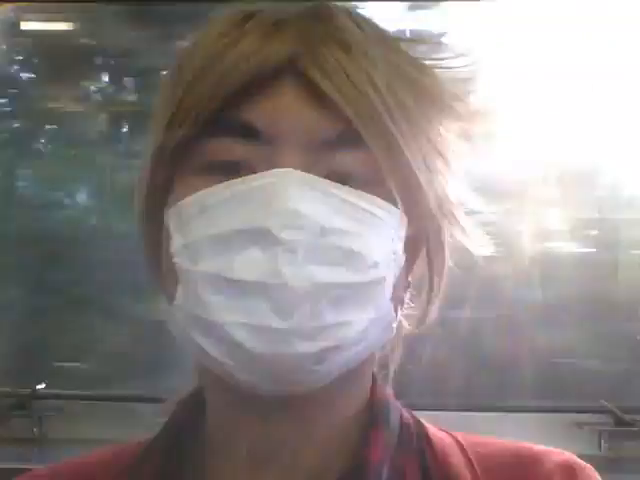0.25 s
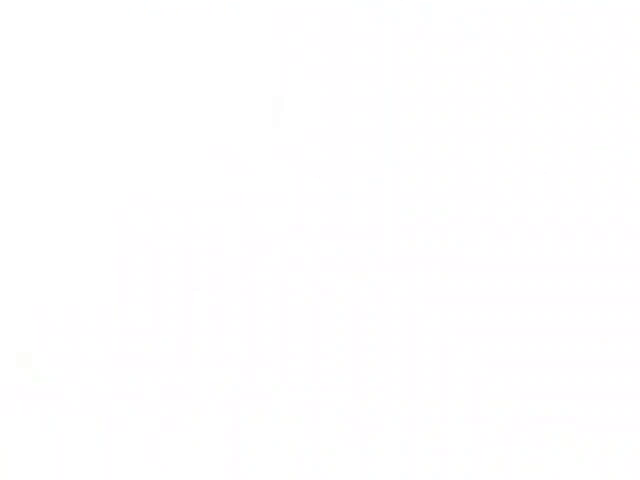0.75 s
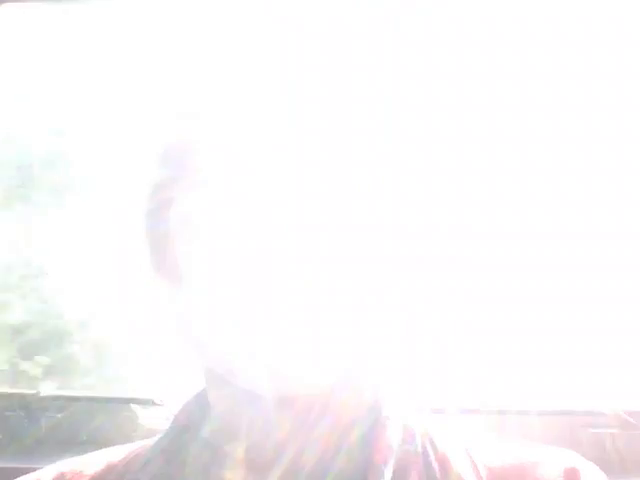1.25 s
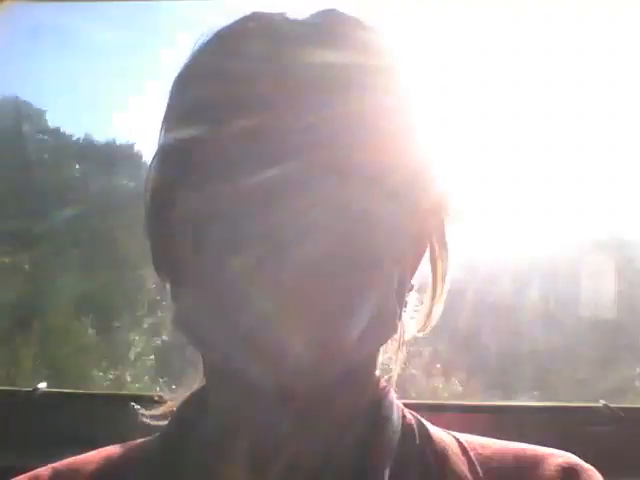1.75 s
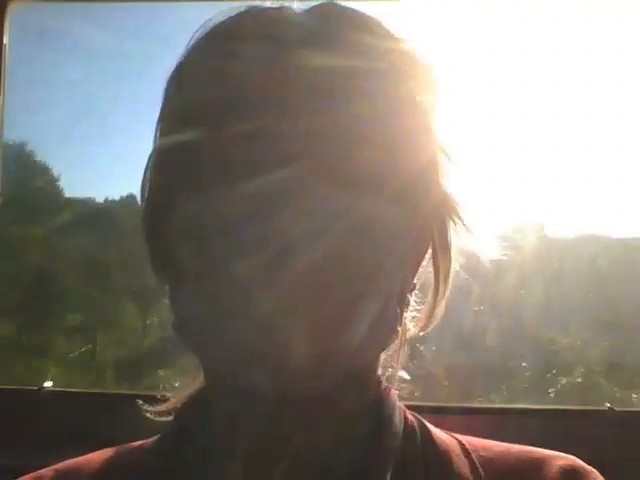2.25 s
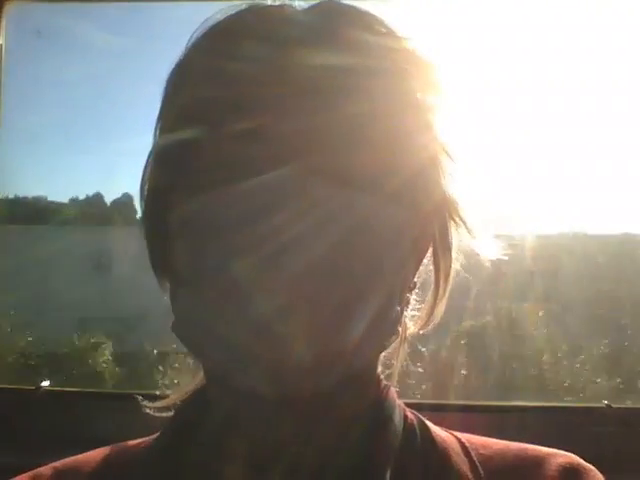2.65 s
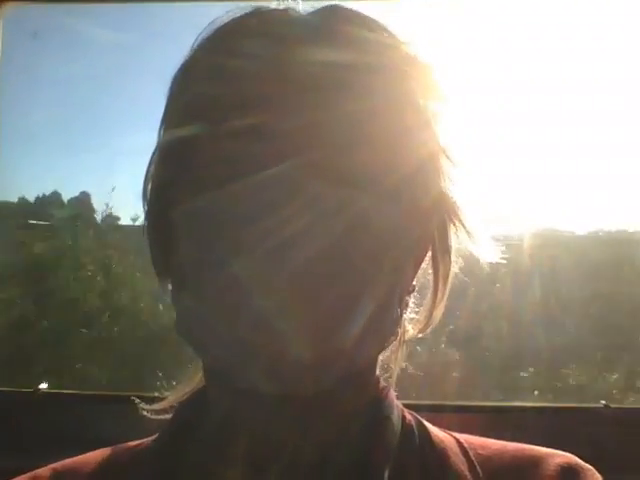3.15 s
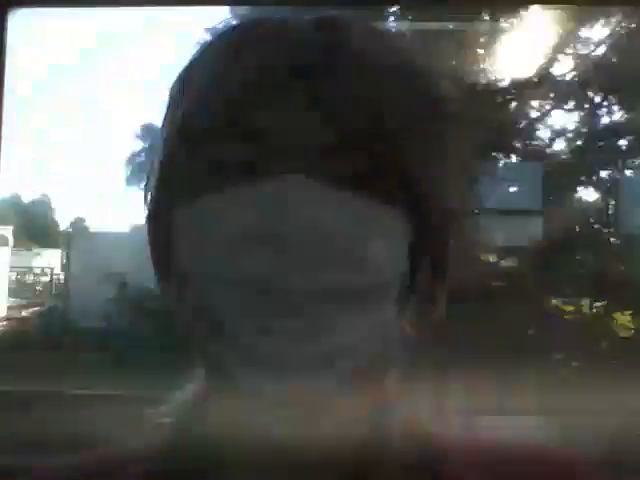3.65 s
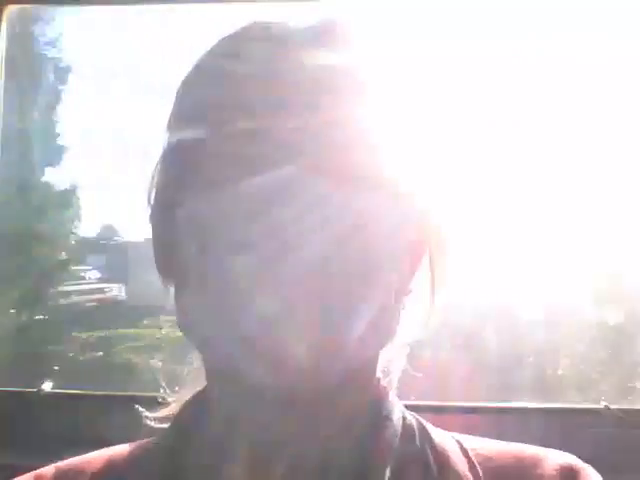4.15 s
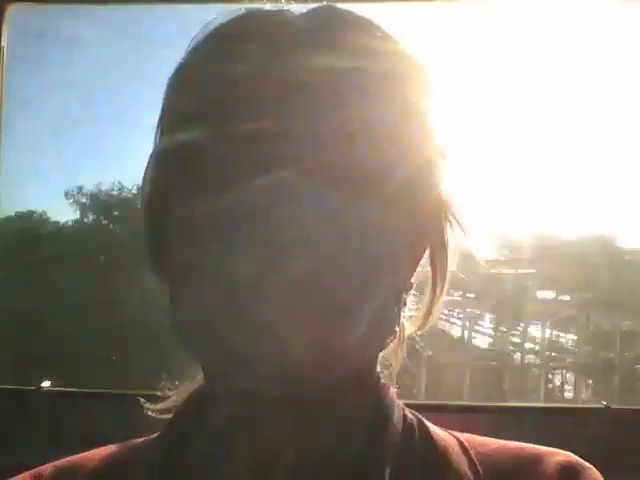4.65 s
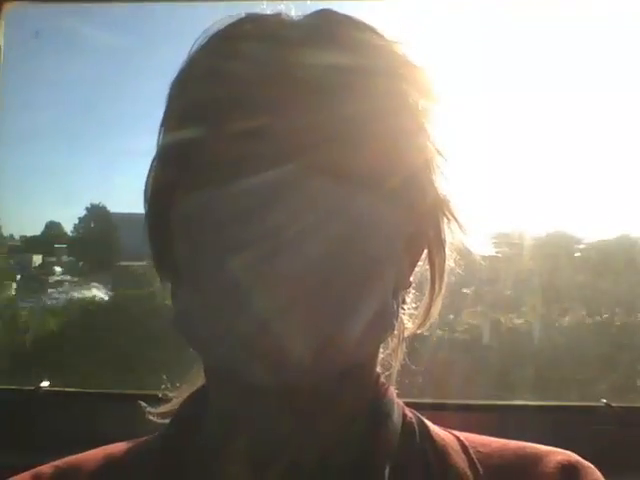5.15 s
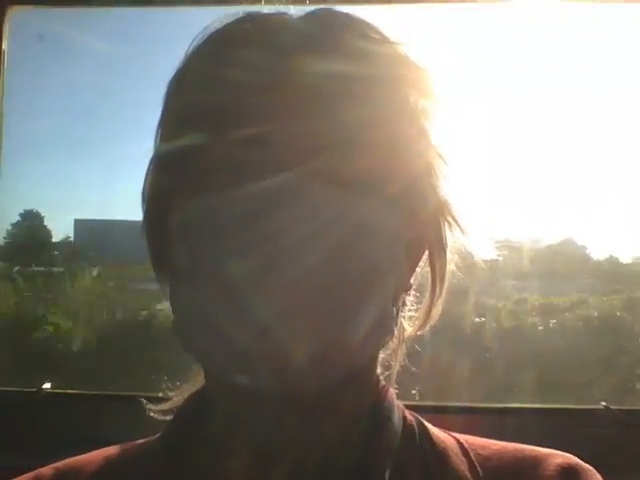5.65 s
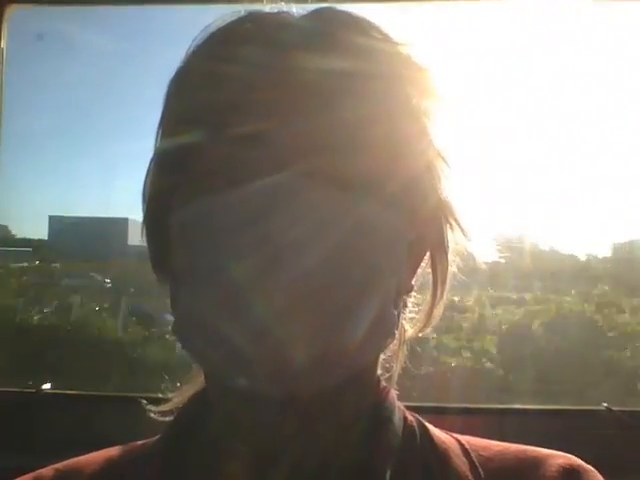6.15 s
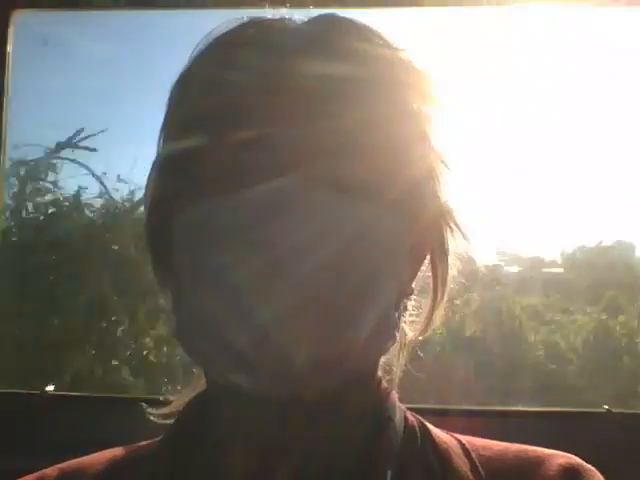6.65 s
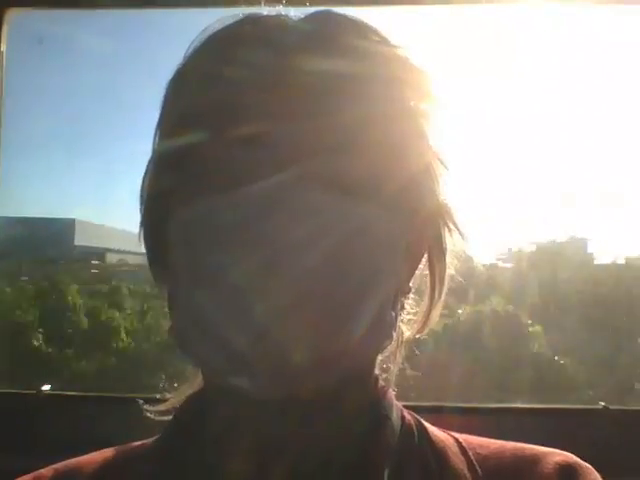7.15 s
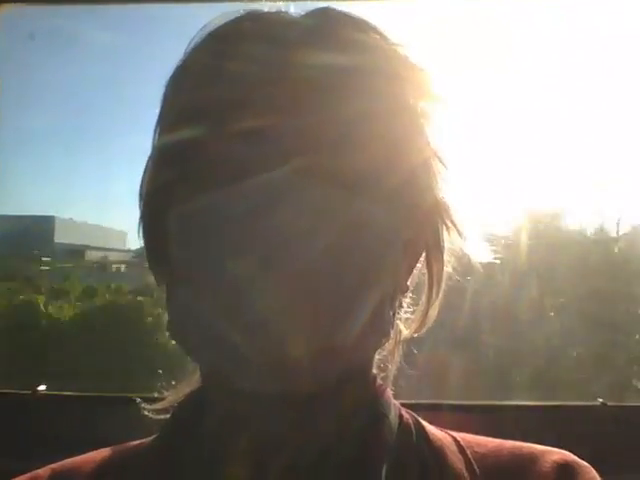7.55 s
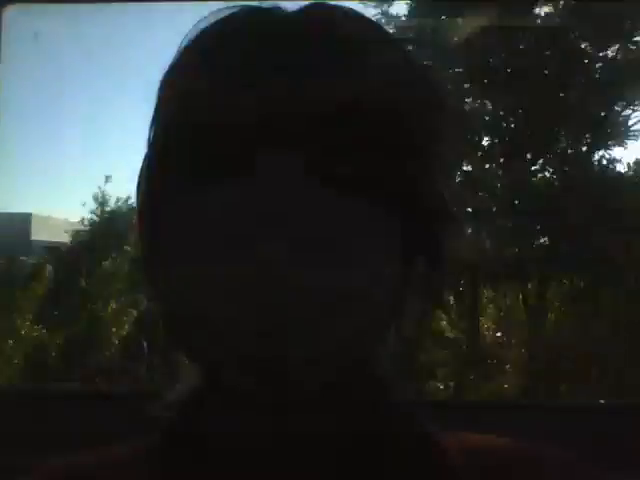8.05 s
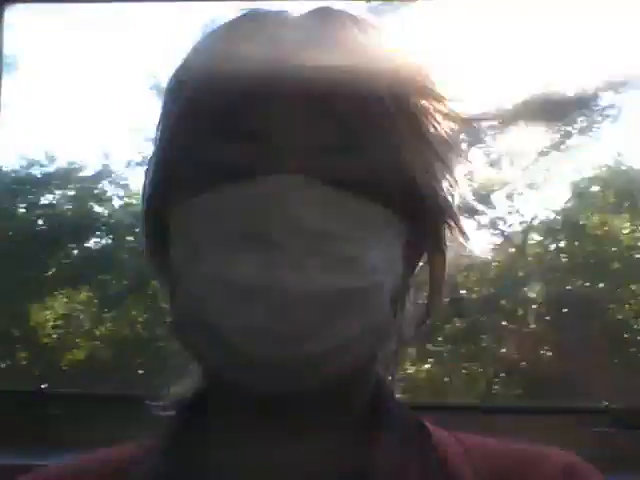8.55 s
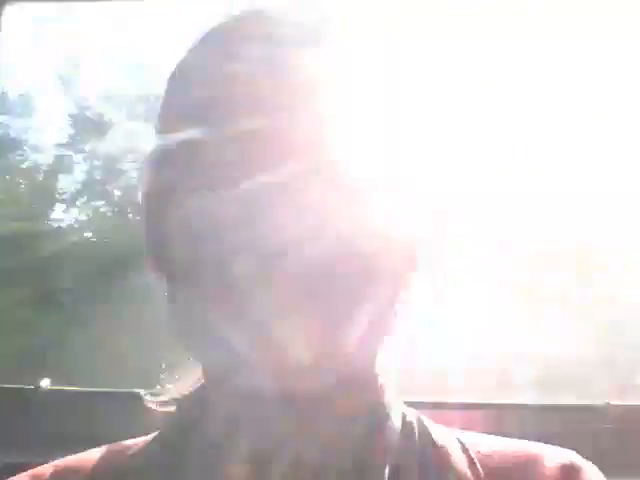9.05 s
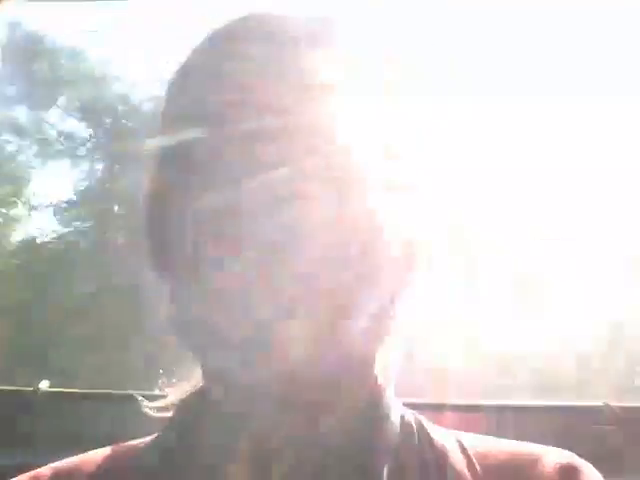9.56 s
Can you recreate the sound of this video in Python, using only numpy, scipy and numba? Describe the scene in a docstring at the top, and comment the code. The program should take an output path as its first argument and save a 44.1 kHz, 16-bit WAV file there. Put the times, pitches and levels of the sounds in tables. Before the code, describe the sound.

Deep body boom near 50 hertz thumps and wavers irregularly beneath rolling rail roar and windy hiss, squashed by a small recorder.

```python
"""Inside a diesel railcar at speed, by an open window.
The car body booms near 50 Hz in uneven surges: a wavering sine with a low shudder of filtered noise.
Shaped noise makes the roar of wheels on rails, the floor rumble and the air rush with its bright swells;
narrow resonances ring in the roar. The engine drones as a tone in a blur, and loose fittings rattle.
A small recorder with a narrow band and a fast limiter ducks everything under the strong surges."""
import sys
import numpy as np
from scipy import signal
from scipy.fft import rfft, irfft, next_fast_len
from scipy.io import wavfile
from scipy.ndimage import uniform_filter1d, minimum_filter1d
from numba import njit

SR = 44100
rng = np.random.default_rng(int(sys.argv[2]) if len(sys.argv) > 2 else 0)


def convert_level_to_amplitude(level_db):
    """Map a level in decibels to its linear amplitude factor."""
    exponent = np.asarray(level_db, float) / 20
    return 10 ** exponent


def materialize(psi):
    """Save the field psi as 16-bit PCM at rate SR to the path in sys.argv[1].

    A 1-D psi becomes a single channel; in a 2-D psi each row is a channel.
    """
    bounded = np.clip(np.atleast_2d(psi).T, -1, 1)
    quanta = np.round(bounded * 32767).astype(np.int16)
    wavfile.write(sys.argv[1], SR, quanta)


N = 432180


def rms_one(x):
    """Scale to rms 1."""
    return x / np.sqrt(np.mean(x ** 2) + 1e-20)


def seconds():
    """Time of every sample."""
    return np.arange(N) / SR


def in_time(rows):
    """Columns of a breakpoint curve, one value per sample."""
    s, *columns = np.transpose(rows)
    return [np.interp(seconds(), s, column) for column in columns]


def drift(rate_hz):
    """Slow random wander of spread 1: noise twice through a one-pole low-pass at rate_hz."""
    # Made at one value per 40 samples, then joined by lines
    r = np.exp(-80 * np.pi * rate_hz / SR)
    noise = rng.standard_normal(N // 40 + 2002)
    slow = signal.lfilter([1], [1, -2 * r, r * r], noise)[2000:]  # skip the filter's start
    return np.interp(np.arange(N) / 40, np.arange(len(slow)), rms_one(slow))


def resonance(x, hz, width_hz):
    """Two-pole resonance with gain 1 at its peak."""
    r = np.exp(-np.pi * width_hz / SR)
    poles = [1, -2 * r * np.cos(2 * np.pi * hz / SR), r * r]
    return signal.lfilter([1, 0, -1], poles, x) * (1 - r * r) / 2


def resonant_noise(hz, width_hz):
    """White noise through one resonance."""
    return resonance(rng.standard_normal(N), hz, width_hz)


def coloured(spectrum, patchy_db, patch_rate_hz):
    """Noise of a given spectrum whose overlapping octave regions flicker each on their own; rms 1."""
    size = next_fast_len(N)
    hz, level_db = np.transpose(spectrum)
    octave = np.log2(np.maximum(np.arange(size // 2 + 1) * SR / size, 1))
    curve_db = np.interp(octave, np.log2(hz), level_db, left=-90, right=-90)
    shaped = rfft(rng.standard_normal(size)) * convert_level_to_amplitude(curve_db)
    out = np.zeros(N)
    for centre in range(int(np.log2(hz[0])), int(np.log2(hz[-1])) + 2):
        share = np.clip(1 - abs(octave - centre), 0, 1)
        region = irfft(shaped * share, size)[:N]
        out += region * convert_level_to_amplitude(patchy_db * drift(patch_rate_hz))
    return rms_one(out)


def rattles(per_s, level_db):
    """Loose fittings knock at random, each knock ringing briefly at one of four pitches."""
    strength = convert_level_to_amplitude(3.4 * rng.exponential(1, N).clip(0, 3))
    knocks = (rng.random(N) < per_s / SR) * strength
    dealt = rng.integers(0, 4, N)
    rings = np.zeros(N)
    for k, hz in enumerate([1810, 2063, 2354, 2650]):
        struck = knocks * (dealt == k) + 1e-18
        rings += resonance(resonance(struck, hz, 70), hz, 70)
    return convert_level_to_amplitude(level_db) * rms_one(rings)


# Bright swells of hiss. Each row: centre in seconds, half length in seconds, peak level in dB.
HISS_SWELLS = [(5.238, 0.063, -30), (5.7, 0.042, -41), (5.769, 0.041, -35), (6.48, 0.12, -33)]


def swells():
    """Brief bright hiss, noise through two resonances, rising out of the air rush and sinking back."""
    s = seconds()
    shape = sum(convert_level_to_amplitude(db) * np.exp(-((s - at) / half) ** 2) for at, half, db in HISS_SWELLS)
    return shape * rms_one(resonance(resonant_noise(3880, 2190), 3924, 3000))


# Steady part of the air past the window. Each row: time in seconds, level in dB before the rush's trim.
STEADY_AIR = [(0.0, -31.5), (0.27, -37), (0.75, -32), (1.37, -35.5), (1.6, -33.5), (2.2, -34), (2.75, -32),
              (3.17, -34.5), (3.45, -34), (3.65, -33), (4.2, -36), (4.6, -32.5), (5.05, -33), (5.55, -34.5),
              (5.95, -32), (6.36, -36), (6.55, -34.5), (7.2, -34), (8.0, -36.5), (8.6, -36), (9.8, -34)]
# Brief gusts on top, a few of them lulls. Each row: centre in seconds, half length in seconds, rise in dB.
AIR_GUSTS = [(0.437, 0.044, 5), (0.6, .05, -1), (0.872, 0.1, -0.5), (1.237, 0.047, 3), (1.78, .05, 1.5),
             (2.07, 0.064, 1), (2.287, 0.042, 3.5), (2.46, .05, 0), (2.9, 0.049, 3), (3.239, 0.053, 2),
             (3.481, 0.026, 4.5), (3.578, .035, 1), (3.714, 0.049, 3.5), (3.9, 0.063, 0.5), (4.401, .06, 3),
             (5.119, 0.049, 0.5), (5.274, 0.13, 4.5), (5.739, 0.1, 4), (6.45, .06, 2.5), (7.379, .08, 1),
             (7.58, 0.043, 2.5), (8.258, 0.06, 0.5), (8.92, .12, 1.5)]


def gusting():
    """Level of the air in dB: the steady part raised or lowered by each gust."""
    s = seconds()
    gusts_db = sum(db * np.exp(-((s - at) / half) ** 2) for at, half, db in AIR_GUSTS)
    return in_time(STEADY_AIR)[0] + gusts_db


# Colour of the air rush. Each row: frequency in Hz, relative level in dB per Hz.
RUSH_SPECTRUM = [(900, -15), (1600, -0.5), (2100, 0.5), (3300, -3.5), (4500, -3), (6000, -4.5), (8000, -9)]


def rush(level_db):
    """Air past the window frame: hiss that brightens in strong gusts and dulls in weak air."""
    hiss = coloured(RUSH_SPECTRUM, patchy_db=0.92, patch_rate_hz=16)
    brightness = np.clip(0.02 * (level_db + 31.0), -.4, 1.5)
    bright = resonance(hiss, 5400, 2800) * brightness
    return convert_level_to_amplitude(level_db + 2.5 + 0.4 * drift(13)) * (hiss + bright)


# Colour of the floor rumble. Each row: frequency in Hz, relative level in dB per Hz.
RUMBLE_SPECTRUM = [(20, 2.5), (36, 6), (70, 3), (100, -1), (190, -6.5), (250, -5.5), (375, -7), (410, -21),
                   (600, -54)]


def rumble(level_db):
    """The floor passes the low part of the rolling noise."""
    return convert_level_to_amplitude(level_db + 5.5) * coloured(RUMBLE_SPECTRUM, patchy_db=0.4, patch_rate_hz=6.8)


DRONE_HZ, FLOOR_HZ, FLOOR_WIDTH_HZ = 134.25, 143.2, 20.6


def drone(level_db):
    """Firing heard through the floor resonance: a wavering tone in a blur of uneven strokes."""
    phase = 2 * np.pi * np.cumsum(DRONE_HZ + 3.54 * drift(4.99)) / SR
    tone = np.sqrt(2) * np.sin(phase) * convert_level_to_amplitude(3.5 * drift(5.0))
    firing = resonant_noise(FLOOR_HZ, FLOOR_WIDTH_HZ)
    blur = rms_one(resonance(firing, FLOOR_HZ, 1.8 * FLOOR_WIDTH_HZ))
    return convert_level_to_amplitude(level_db - 3.5) * (tone + convert_level_to_amplitude(-3) * blur)


# Colour of the broad rolling roar. Each row: frequency in Hz, relative level in dB per Hz.
ROAR_SPECTRUM = [(250, -8), (400, 1), (600, 2), (720, 1), (900, 0), (1250, -3.5), (1480, -11.5),
                 (2600, -15), (4000, -31)]
# Wheel and panel resonances. Each row: pitch in Hz, width in Hz, mean level in dB against the broad roar.
ROAR_RINGS = [(218.4, 13, -14), (238.2, 18, -13), (365.6, 15.4, -10.5), (609, 29, -13.5),
              (820.8, 11.5, -12.5), (1054, 6.4, -18), (1113.4, 15, -13), (1166.4, 24, -13),
              (1309, 8.1, -20.5)]


def roar(level_db):
    """Rail roughness shakes wheels and floor: broad noise plus their narrow, wavering resonances."""
    rings = np.zeros(N)
    for hz, width_hz, db in ROAR_RINGS:
        rings += convert_level_to_amplitude(db + 2.34 * drift(2.8)) * rms_one(resonant_noise(hz, width_hz))
    broad = coloured(ROAR_SPECTRUM, patchy_db=0.14, patch_rate_hz=4.3)
    return convert_level_to_amplitude(level_db - 3.5) * (broad + rings)


# Body boom between surges. Each row: time in seconds, pitch in Hz, level in dB before the boom's trim.
CALM_BOOM = [(0.0, 45.8, -15), (0.7, 54.5, -17.5), (1.0, 47.6, -21.5), (1.55, 44.1, -11), (2.0, 51.4, -16),
             (2.25, 58.23, -23.5), (2.5, 51.5, -13), (2.83, 59.7, -26.5), (3.0, 48.13, -14.5),
             (3.4, 54.2, -18), (3.68, 53.84, -10.5), (4.15, 45.48, -19), (4.45, 53.3, -11),
             (4.9, 49.16, -18.5), (5.2, 50, -10), (5.6, 56.1, -16.5), (5.8, 51.47, -23),
             (6.22, 52.05, -13.5), (6.55, 51.65, -20.5), (7.4, 53.7, -19), (7.82, 49.24, -15),
             (8.05, 53.04, -19.5), (8.5, 38.9, -11), (9.05, 57, -20), (9.8, 55, -20.5)]
# Surges as the car is jolted. Each row: peak time in seconds, pitch in Hz, peak level in dB before the trim,
# half length in seconds.
BOOM_SURGES = [(0.113, 53.7, -7, 0.15), (0.224, 49, -8.5, 0.088), (0.344, 51.6, -1.5, 0.025),
               (0.46, 57.2, -10, 0.095), (0.578, 51.8, 0.5, 0.029), (0.913, 51.35, -3, 0.023),
               (1.069, 51.6, -2, 0.053), (1.325, 51.36, -4.5, 0.056), (1.687, 45.24, -8, 0.046),
               (1.821, 52.9, -5, 0.067), (1.954, 47.8, -7, 0.089), (2.159, 52.76, -8, 0.055),
               (2.318, 53.9, -1.5, .045), (2.513, 57.7, -5, 0.069), (2.642, 56.6, -2.5, 0.065),
               (2.915, 44, -12, 0.07), (3.108, 53, -3.5, 0.052), (3.16, 43, -1.5, 0.038),
               (3.309, 48.8, -5.5, 0.11), (3.507, 48.6, -4, 0.1), (3.813, 55.13, -6, 0.043),
               (3.862, 46.03, -7.5, 0.049), (3.923, 53.1, -4, 0.031), (3.987, 48, -2.5, 0.048),
               (4.039, 45.84, -1.5, 0.036), (4.208, 44, -8, 0.053), (4.328, 54, -8.5, 0.053),
               (4.58, 48.98, -7.5, 0.097), (4.69, 51.7, 3.5, .023), (4.828, 55, -9.5, 0.066),
               (4.945, 47.4, -6, 0.046), (5.07, 42.9, 1, .06), (5.349, 43.4, -1.5, 0.035),
               (5.448, 53.9, -3, 0.039), (5.6, 56.8, -13.5, 0.049), (5.875, 41.94, 0, 0.0403),
               (5.97, 57.4, -3, .04), (6.081, 48.53, -3.5, 0.03), (6.304, 50.2, -6, 0.026),
               (6.455, 43.2, -15, 0.076), (6.683, 45, -8.5, .12), (6.836, 39.04, -3, 0.048),
               (7.03, 47.2, -7.5, 0.092), (7.271, 52, -12, .12), (7.467, 45.15, -7.5, 0.041),
               (7.521, 47.86, -8.5, 0.037), (7.609, 41.96, -4.5, 0.032), (8.008, 49.3, -10.5, .06),
               (8.17, 45.4, -8.5, .1), (8.27, 46.12, -12, 0.093), (8.921, 56, -9.5, 0.054),
               (8.98, 50.4, -6.5, 0.051), (9.239, 55.57, -7.5, .08), (9.364, 46.1, -6, 0.058)]
SURGE_DROP_DB = 12.5  # fall over one half length, either side of the peak


def surging():
    """Pitch and level of the boom: each surge swings against the one before, so the level sags where
    they meet; the strongest weighs most on the pitch."""
    hz, level_db = in_time(CALM_BOOM)
    s = seconds()
    calm = convert_level_to_amplitude(2 * level_db)  # as power
    power, pitched, height = calm, calm * hz, 0
    for k, (at, surge_hz, peak_db, half) in enumerate(BOOM_SURGES):
        surge = convert_level_to_amplitude(np.maximum(peak_db - SURGE_DROP_DB * abs(s - at) / half, -90))
        power = power + surge ** 2
        pitched = pitched + surge ** 2 * surge_hz
        height = height + surge * (-1) ** k
    return pitched / power, 10 * np.log10(calm + height ** 2)


def boom():
    """The body swings almost as a sine, wavering in pitch and height; looser panels shudder along."""
    hz, level_db = surging()
    phase = 2 * np.pi * np.cumsum(hz + 3.943 * drift(17.67)) / SR
    swing = np.sqrt(2) * np.sin(phase) * convert_level_to_amplitude(1.4 * drift(25))
    shudder = rms_one(resonance(resonant_noise(31.2, 21.0), 47.5, 54))
    return convert_level_to_amplitude(level_db - 2.5) * (swing + convert_level_to_amplitude(-5.0) * shudder)


# The run, levels before each source's own trim. Each row: time in seconds, floor rumble in dB,
# rolling roar in dB, engine drone in dB.
RUN_LEVELS = [(0.0, -23, -22, -31), (0.98, -23, -21, -22.5), (1.53, -23, -20, -25.5),
              (1.9, -22, -21.3, -22), (2.6, -19, -20.5, -20.5), (3.42, -19.5, -21, -20.5),
              (4.1, -23.5, -23, -31.5), (4.68, -20, -19, -23), (4.97, -19.5, -18.5, -29),
              (5.27, -20, -17.5, -19.5), (5.5, -21, -20.5, -24), (6.1, -19.5, -19, -22.5),
              (6.35, -24.5, -20.5, -28.5), (6.94, -21, -20.5, -20.5), (7.22, -17.5, -18, -28),
              (7.52, -21.5, -20.5, -22), (8.1, -22.5, -21.5, -25.5), (8.95, -21, -19.5, -17),
              (9.8, -20.5, -19, -19)]


def scene():
    """All sources summed at one microphone."""
    rumble_db, roar_db, drone_db = in_time(RUN_LEVELS)
    air = rush(gusting()) + swells()
    rolling = rumble(rumble_db) + roar(roar_db)
    car = boom() + rolling + drone(drone_db) + rattles(per_s=22, level_db=-45.5)
    return (car + air)[None]


RECORDER_RATE = 16000  # samples per second
LIMIT_DRIVE_DB, LIMIT_TOP, CEILING = 4, 0.59, 0.625  # input gain; threshold and hard clip in full scale
LIMIT_ATTACK_S, LIMIT_RELEASE_S = 0.0054, 0.047


@njit
def held_peak(size, fall):
    """Jumps to each new peak, then sinks exponentially."""
    out, peak = np.empty_like(size), 0.
    for i in range(len(size)):
        peak = max(size[i], peak * fall)
        out[i] = peak
    return out


def limiter(x):
    """Looks a little ahead, eases the gain down around each peak, recovers with the release time."""
    ahead = max(int(LIMIT_ATTACK_S * RECORDER_RATE), 1)
    coming = -minimum_filter1d(-abs(x), size=ahead + 1)  # running maximum
    peak = held_peak(coming, np.exp(-1 / (LIMIT_RELEASE_S * RECORDER_RATE)))
    gain = uniform_filter1d(LIMIT_TOP / np.maximum(peak, LIMIT_TOP), size=2 * ahead)
    return np.clip(x * gain, -CEILING, CEILING)


def top_cut(x):
    """Nothing passes above the cut-off."""
    return signal.sosfilt(signal.butter(12, 14960, fs=SR, output="sos"), x)


FILTER_HZ, BASS_CUT_HZ = 6570, 31.7
HOLD_SHARE, HOLD_CUT_HZ = 0.22, 15900  # share of stair-step edges, and their low-pass


def record(dry):
    """Filtered, sampled slowly and limited; coarse joining of samples mirrors treble above half that rate."""
    low_pass = signal.butter(8, FILTER_HZ, fs=SR, output="sos")
    bass_cut = signal.butter(3, BASS_CUT_HZ, "high", fs=SR, output="sos")
    filtered = signal.sosfilt(bass_cut, signal.sosfilt(low_pass, dry[0]))
    sampled = signal.resample_poly(filtered, 160, 441, padtype="line")  # 44100 to 16000 per second
    limited = limiter(sampled * convert_level_to_amplitude(LIMIT_DRIVE_DB))
    # Back to SR: straight lines between samples, plus some of the stair-step of held samples
    place = np.arange(N) * RECORDER_RATE / SR
    lines = np.interp(place, np.arange(len(limited)), limited)
    steps = limited[np.minimum(np.round(place).astype(int), len(limited) - 1)]
    hold_cut = signal.butter(4, HOLD_CUT_HZ, fs=SR, output="sos")
    edges = signal.sosfilt(hold_cut, steps - lines)
    mix = (lines + HOLD_SHARE * edges)[None]
    return top_cut(mix)


dry = scene()
out = record(dry)
materialize(out)
```